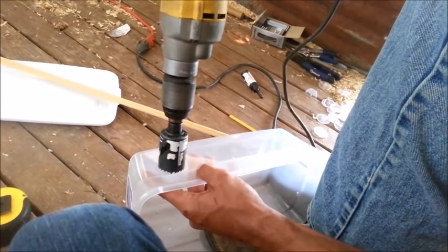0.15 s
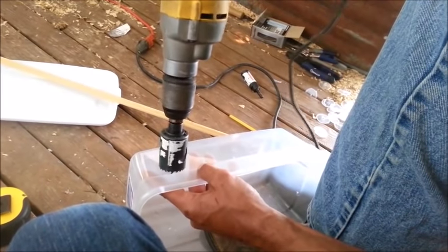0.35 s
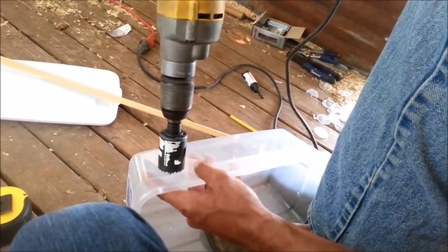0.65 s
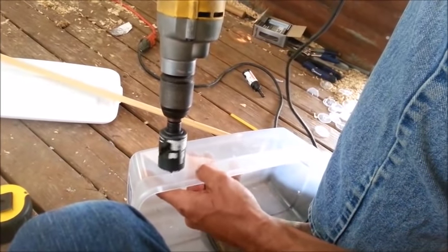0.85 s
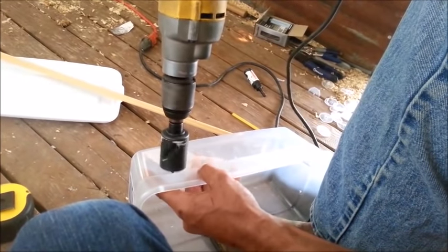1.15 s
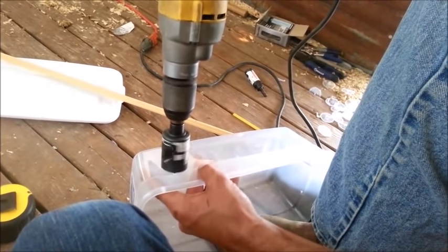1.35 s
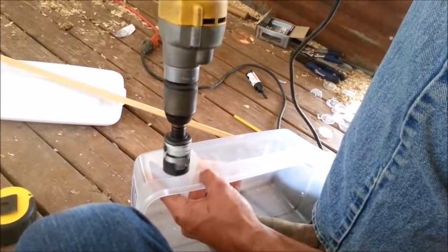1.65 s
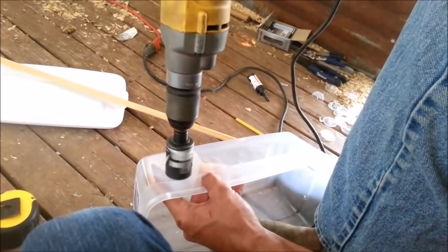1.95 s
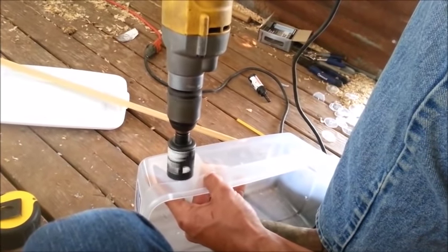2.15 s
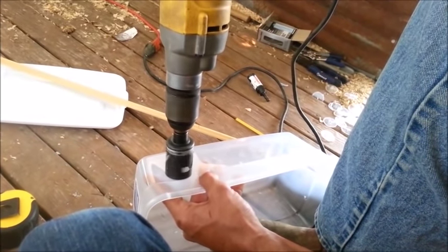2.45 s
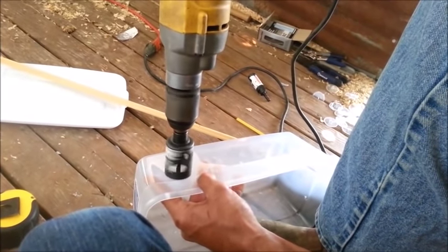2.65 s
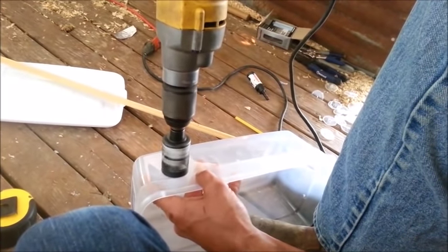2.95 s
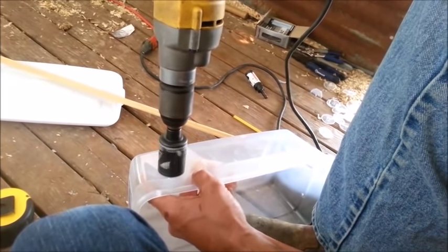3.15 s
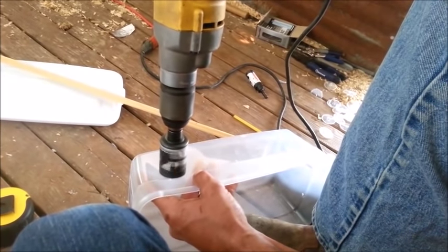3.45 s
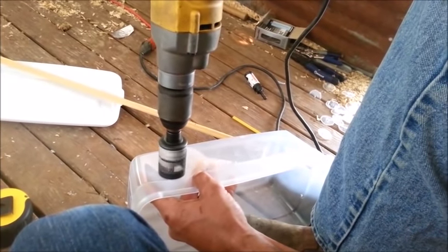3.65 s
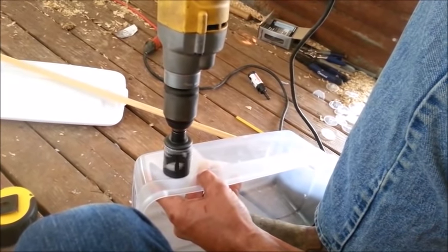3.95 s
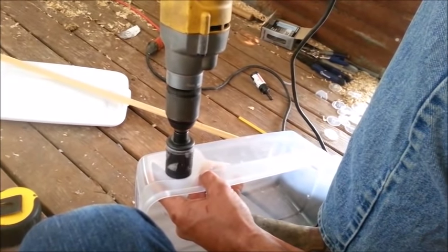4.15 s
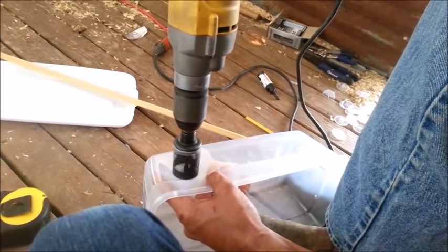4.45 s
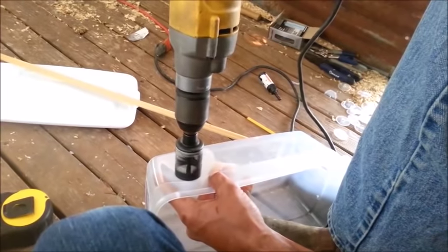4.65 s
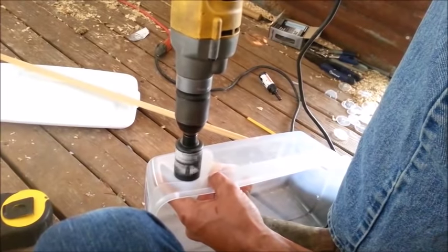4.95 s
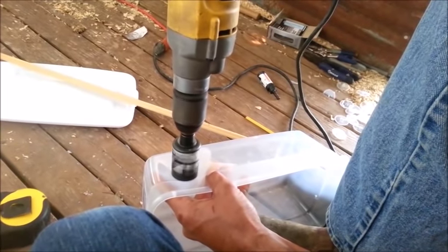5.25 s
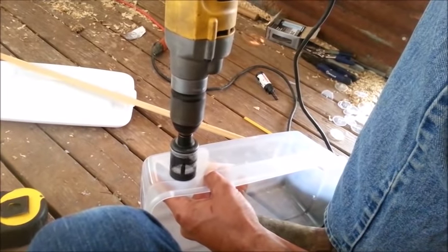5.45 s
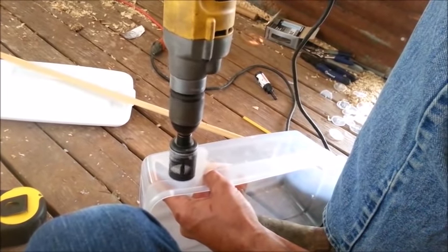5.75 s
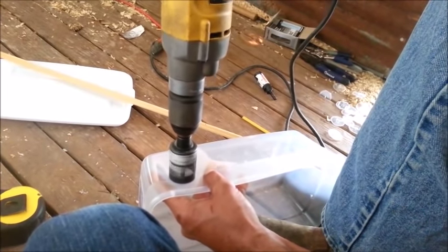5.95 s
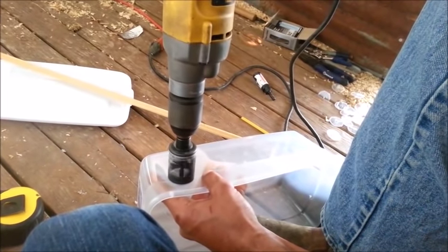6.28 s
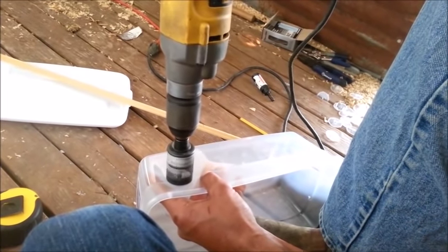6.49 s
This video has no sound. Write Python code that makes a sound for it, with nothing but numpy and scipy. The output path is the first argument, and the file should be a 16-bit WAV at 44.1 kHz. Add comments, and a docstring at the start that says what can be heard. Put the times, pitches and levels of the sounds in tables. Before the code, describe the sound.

A corded electric drill rattles, speeds up in steps with a rising whine, then its hole saw rasps into thin plastic.

```python
"""First, the loose gears of a coasting drill rattle and knock, outdoors, close to a mono microphone.
The trigger is squeezed step by step and mains pulses kick the corded motor up to speed: slots and gear
teeth whine, brushes hiss and the fan rushes. Near six seconds its hole saw bites a thin plastic tub with
a thump and rasps. The tub, deck boards and a wall reflect the sound; faint air and hum lie behind it."""
import sys
import numpy as np
from scipy import signal
from scipy.fft import rfft, irfft, next_fast_len
from scipy.io import wavfile
from scipy.ndimage import map_coordinates

SR = 44100
rng = np.random.default_rng(int(sys.argv[2]) if len(sys.argv) > 2 else 0)


def store_pcm(level_fs):
    """Save levels as 16-bit WAV."""
    pcm = np.round(np.clip(level_fs, -1, 1) * 32767).astype(np.int16)
    wavfile.write(sys.argv[1], SR, np.atleast_2d(pcm).T)


N = 291942
TIME = np.arange(N) / SR

# Trigger squeezes: t/s, added shaft speed/Hz, rattle jolt/dB, thrum jolt/dB
SQUEEZES = [(.675, 50, -1.5, 20), (.805, 88.4, 6, -.5), (1.595, 3, 4.5, 3.5), (1.84, 29.7, 4.5, 4),
            (2.119, 9.5, 5, 6), (2.357, 88, 2.5, 5), (2.486, 14.7, -1.5, -2.5), (3.533, 9.7, 1, 2),
            (3.921, 30.5, -1, 1), (4.203, 10.44, 0.5, 1), (5.065, 9, 1, 0), (5.509, 7.7, -.5, 2.5)]
# Backlash knocks: t/s, relative level/dB
KNOCKS = [(0.2019, -14), (0.2824, -17), (0.3975, -23), (0.601, -34), (0.688, -18.5), (0.745, -14),
          (0.757, -11), (1.2047, -17), (1.6222, -22)]
# Resonances of the metal gear case and of the housing: f/Hz, width/Hz, gain/dB
CASE_MODES = [(2087, 180, -6), (2244, 190, 0.5), (2391, 62, -0.5), (2630, 59, -13), (2810, 580, -9),
              (3950, 330, -24), (4550, 200, -29), (8200, 120, -28)]
HOUSING_MODES = [(342, 64, 7.5), (465, 94, 4.5), (890, 290, -14)]
# Gear and shaft tones: multiple of the shaft speed, relative level/dB
GEAR_ORDERS = [(2, 0.5), (2.583, -6.5), (4, 2.5), (5.167, -8.5), (6, -3), (7.75, -3.5), (8.75, -16),
               (17, -31), (19, -15), (34, 1.5), (60, 5)]
# How well the drill's shell radiates the gear tones and each armature whine: f/Hz, gain/dB
GEAR_RESPONSE = [(180, -12), (370, -6), (590, -1), (670, -19), (810, -1.5), (1170, 2.5), (1400, -16),
                 (1700, -7), (2100, 6.5), (2750, -7), (4300, -12), (4720, 12), (5300, -6), (7200, -24),
                 (10500, -48)]
SLOT_RESPONSE = [(900, -78), (1400, -44), (1800, -22), (2100, -18.5), (2600, -17), (3250, -25.5),
                 (3830, -26), (3990, -18), (4060, -22)]
BAR_RESPONSE = [(1800, -66), (2600, -50), (3150, -39), (3480, -24), (4250, -23), (4750, -18.5), (5400, -26),
                (6050, -19.5), (7300, -25.5), (7700, -36)]
WHISTLE_RESPONSE = [(3200, -65), (4100, -42), (4750, -24), (5700, -29), (7300, -24.5), (9400, -32),
                    (11800, -33.5), (12350, -24), (13200, -38.5)]
# Spectra of brush hiss, fan air and saw rasp: f/Hz, relative level/dB
BRUSH_SPECTRUM = [(1500, -45), (2600, -1), (2920, 2.5), (3250, -0.5), (3950, 0.5), (4300, 0), (4810, 4.5),
                  (5250, 0.5), (6130, -0.5), (6950, -6), (7600, -9), (7860, -0.5), (8150, -17), (9900, -16),
                  (11000, -33.5), (12200, -77)]
FAN_SPECTRUM = [(60, -60), (140, -55), (220, -18.5), (400, -17), (650, -14.5), (780, -0.5), (890, 1.5),
                (1130, -1), (1330, -5), (1580, -9), (1850, -4.5), (2100, -0.5), (2700, -21), (4000, -17.5),
                (9000, -15.5), (12000, -66)]
RASP_SPECTRUM = [(150, -45), (320, 12), (480, -4), (650, -21), (1600, 2), (2100, 8), (3300, 12.5),
                 (4300, 14.5), (5500, -15), (9000, -0.5), (12000, -53)]
# The saw's rasp and drone on the tub: t/s, level/dB
SAW_LEVEL = [(5.6, -57), (5.93, -21), (5.96, -13.5), (6.1, -15.5), (6.25, -15), (6.45, -14.5), (6.62, -15)]
# Reflections from the tub, the deck boards and the wall: delay/s, gain/dB
ECHOES = [(.0023, -30.5), (.0047, -19.5), (.0079, -17), (.0131, -19.5), (.0173, -21.5), (.0262, -20.5)]
# A low hum near the microphone: t/s, level/dB
HUM_LEVEL = [(0, -47), (4.6, -52.5), (4.9, -91), (6.62, -63)]
# Open air around the microphone: f/Hz, relative level/dB
OUTDOOR_SPECTRUM = [(20, -33), (50, -17), (90, -5.5), (350, 5.5), (700, -8), (2000, -10), (8000, -21),
                    (14000, -35)]
# Loudness laws: relative level at speed/dB, fall per octave below the knee/dB, knee/Hz,
# gain per octave that the rotor lags the trigger/dB, gain while cutting/dB
RATTLE_LAW = (-20, 6, 142, 0.66, 4)
THRUM_LAW = (-31.5, 5.5, 174, 4, 5.5)
HISS_LAW = (-12.5, 11.5, 266, 5, -1.2)
FAN_LAW = (-15, 14, 277, -3.5, -4.2)
MESH_LAW = (-28.5, 19, 201, 1, -7)

MAINS_HZ, BAND_LIMIT_HZ = 60.07, 14480
FULL_TRIGGER_HZ = 401  # trigger setting at which the mains would pass unchopped
SQUEEZE_S, INERTIA_S, COAST_HZ = .06, .672, 57.89  # length of a squeeze, rotor lag, opening speed
JOLT_RISE_S, JOLT_FADE_S = 0.03, 0.18
BITE_S = 5.9445  # the saw's teeth catch the plastic
DRAG_HZ, SNAG_HZ, SNAG_S = 6, 26.93, .12  # speed lost to cutting, extra loss at the bite, its decay
MESH_PULL_HZ, MESH_PULL_DB = 40, 3.5  # gear tones: reference pull, gain per doubling of pull
RATTLE_CHOP, SLOT_CHOP, SPARK_CHOP, SPARK_IDLE = .55, 3.6, 0.16, 0.039  # how much each follows the kicks


def motor():
    """Trigger setting and shaft speed in Hz: the heavy rotor creeps toward the setting, less saw drag."""
    trigger = sum(hz * ramp(s, SQUEEZE_S) for s, hz, _, _ in SQUEEZES)
    drag = (TIME > BITE_S) * (DRAG_HZ + SNAG_HZ * fading(BITE_S, SNAG_S))
    step = 1 / (INERTIA_S * SR)
    driven = signal.lfilter([step], [1, step - 1], trigger - drag)
    return trigger, driven + COAST_HZ * fading(0, INERTIA_S)


def mains_kicks(share, lag, sharp):
    """Gain of mean power 1 that peaks once a mains cycle, when the trigger switch fires."""
    pulse = np.exp(sharp * np.cos(2 * np.pi * (MAINS_HZ * TIME - lag)))
    share = np.clip(share, 0, 1)
    return np.sqrt(1 - share + share * pulse / pulse.mean())


def jolts():
    """The gears shake after each squeeze, then settle: extra dB of rattle and of thrum."""
    return sum(np.outer(db, ramp(s, JOLT_RISE_S) * fading(s, JOLT_FADE_S)) for s, _, *db in SQUEEZES)


def loudness(law, speed, pull):
    """A part's level in dB: grows with speed up to a knee, shifts as the motor pulls and the saw cuts."""
    full_db, octave_db, knee_hz, lag_db, cutting_db = law
    octaves_below = np.log2(1 + (knee_hz / speed) ** 4) / 4
    octaves_behind = np.log2(1 + pull / speed)
    return full_db - octave_db * octaves_below + lag_db * octaves_behind + cutting_db * ramp(BITE_S, .05)


def gearbox(speed, chop, rattle_db, thrum_db):
    """Loose teeth clatter at every mains kick and ring the metal case and the housing."""
    teeth = contacts(500 + 9 * speed, spread_db=0.0, life=0.0028)
    teeth *= mains_kicks(chop, lag=0.58, sharp=2.4)
    rattle = coloured(ring(teeth, CASE_MODES),
                      [(600, 0), (1500, -3.5), (1900, 9.5), (9000, -4.5), (12000, -53)])
    shake = contacts(14 * speed, spread_db=2.5, life=0.001) * mains_kicks(2 * chop, lag=0.56, sharp=1)
    thrum = coloured(ring(shake, HOUSING_MODES),
                     [(50, -37), (170, -5.5), (280, 1), (540, 5.5), (680, -5), (1200, 5), (9000, -42)])
    return amp(rattle_db - 2) * rattle + amp(thrum_db - 1.5) * thrum


def backlash():
    """Single knocks as the slack in the gears is taken up."""
    blows = np.zeros(N)
    t = np.arange(SR // 20) / SR
    for s, db in KNOCKS:
        blows[round(s * SR):][:len(t)] += amp(db - 60 * t / 0.049) * rng.standard_normal(len(t))
    struck = amp(3) * ring(blows, CASE_MODES) + amp(-9) * ring(blows, HOUSING_MODES) + amp(-11.5) * blows
    return filtered(struck, lambda f: f ** 2 / (f ** 2 + 200 ** 2) / (1 + (f / 7500) ** 8))


def gear_tones(turns, pull, mesh_db):
    """Meshing teeth sing, louder under load, swelling as they sweep through the shell's resonances."""
    tones = sum(amp(db + 3.2 * wobble(6.03)) * np.sin(2 * np.pi * order * turns + .5 * wobble(25))
                for order, db in GEAR_ORDERS)
    load_db = MESH_PULL_DB * np.log2(.05 + pull / MESH_PULL_HZ)
    return np.sqrt(2) * amp(mesh_db + load_db) * filtered(tones, lambda f: amp(along(GEAR_RESPONSE, f)))


def armature_whine(speed, turns, chop):
    """The armature's slots and bars sing; each mains kick twists the rotor and smears the pitch."""
    slot_order, bar_order, whistle_order = 12, 24, 40  # cycles per turn
    angle = 2 * np.pi * turns
    sway = np.sin(2 * np.pi * MAINS_HZ * TIME)
    strain = np.interp(speed, [195, 245], [1, .12])  # greatest while the motor gathers speed
    cogging = np.interp(speed, [135, 158], [1, 0])  # a slow rotor turns in jerks
    slot_jerk = chop * (.5 * sway + (0.46 + 1.4 * strain) * wobble(170))
    slots = mains_kicks(chop, lag=0.43, sharp=7.8) * np.sin(slot_order * angle + slot_jerk)
    bar_jerk = strain * (sway + wobble(220))
    bars = mains_kicks(strain, lag=.45, sharp=3.7) * np.sin(bar_order * angle + bar_jerk)
    bars = 0.68 * bars + ring(bars, [(4600, 150, -1.2)])  # the motor frame squeals as the tone passes
    flicker = amp(3.1 * wobble(40))
    whistle_jerk = .5 * sway + (0.28 + .5 * strain + 1.6 * cogging) * wobble(190)
    whistle = flicker * np.sin(whistle_order * angle + whistle_jerk)
    whines = [(slots, SLOT_RESPONSE, slot_order), (bars, BAR_RESPONSE, bar_order),
              (whistle, WHISTLE_RESPONSE, whistle_order)]
    return np.sqrt(2) * sum(amp(along(response, order * speed) + 1.7 * wobble(9.9)) * tone
                            for tone, response, order in whines)


def brushes(speed, chop, hiss_db):
    """Carbon brushes scrape on the commutator and spark at each kick."""
    scrape = contacts(24 * speed, spread_db=2.5, life=0.0018) * mains_kicks(chop, lag=0.55, sharp=3.5)
    return amp(hiss_db - 1) * coloured(scrape, BRUSH_SPECTRUM)


def fan(air_db):
    """Cooling air rushes through the vents."""
    return amp(air_db + 1.5 + 1.4 * wobble(13)) * coloured(noise(), FAN_SPECTRUM)


def hole_saw(turns):
    """The saw bites with a thump, rasps, and passes the shaft's shaking on to the tub."""
    rasp = coloured(contacts(1500, spread_db=3.5, life=0.0011), RASP_SPECTRUM)
    shaking = np.sin(2 * np.pi * turns) + amp(-9.5) * np.sin(4 * np.pi * turns)
    drone = amp(-11 + 1.21 * wobble(15)) * shaking
    t = np.maximum(TIME - BITE_S, 0)
    swell = t / 0.00069  # the thin wall flexes for only a few cycles
    thump = amp(7.5) * swell ** 2 * np.exp(-swell) * np.sin(2 * np.pi * 440 * t)
    thump = filtered(thump, lambda f: f ** 4 / (f ** 4 + 170 ** 4))  # a small wall radiates no deep bass
    return amp(along(SAW_LEVEL, TIME)) * (rasp + drone) + thump


def reflections(x):
    """Close surfaces send weak, late copies to the microphone, which make sweeping tones flutter."""
    copies = sum(amp(db) * np.pad(x, (round(s * SR), 0))[:N] for s, db in ECHOES)
    return amp(-0.21) * (x + copies)


def outdoor_ambience():
    """Behind the drill: quiet open air and a nearby hum at twice the mains frequency."""
    hum = np.sqrt(2) * amp(along(HUM_LEVEL, TIME)) * np.sin(2 * np.pi * 2 * MAINS_HZ * TIME)
    return hum + amp(-46) * coloured(noise(), OUTDOOR_SPECTRUM)


def contacts(rate, spread_db, life):
    """Short scrapes at random times, rate a second, whose power decays over life seconds; rms 1."""
    size = amp(spread_db * np.clip(noise(), -2, 2)) * (rng.random(N) < rate / SR)
    power = signal.lfilter([1], [1, -np.exp(-1 / (life * SR))], size ** 2) / rate
    return unit(np.sqrt(power) * noise())


def ring(x, modes):
    """x through the resonances of a body."""
    return filtered(x, lambda f: sum(amp(db) * 1j * f * width / (hz * hz - f * f + 1j * f * width)
                                     for hz, width, db in modes))


def coloured(x, spectrum):
    """x shaped by (f/Hz, level/dB) points, at rms 1."""
    hz, db = np.transpose(spectrum)
    return unit(filtered(x, lambda f: amp(np.interp(np.log(f + 1), np.log(hz), db))))


def filtered(x, response):
    """x times a complex response of frequency."""
    size = next_fast_len(N + SR // 2)
    return irfft(rfft(x, size) * response(np.fft.rfftfreq(size, 1 / SR)), size)[:N]


def noise():
    """Fresh white noise."""
    return rng.standard_normal(N)


def wobble(rate):
    """A smooth random curve, rate knots a second."""
    return map_coordinates(rng.standard_normal(int(N * rate / SR) + 4), [TIME * rate])


def along(points, at):
    """Reads between points joined by straight lines."""
    return np.interp(at, *np.transpose(points))


def ramp(start, length):
    """Rises from 0 to 1."""
    return np.clip((TIME - start) / length, 0, 1)


def fading(start, life):
    """1 until the start, then an exponential decay."""
    return np.exp(-np.maximum(TIME - start, 0) / life)


def amp(db):
    """Decibels to gain."""
    return 10 ** (np.asarray(db) / 20)


def unit(x):
    """Scale to rms 1."""
    return x / np.sqrt(np.mean(x ** 2) + 1e-20)


def scene():
    """The drill at close range, driven by one shaft's speed and pull; one microphone on both channels."""
    trigger, speed = motor()
    pull = np.maximum(trigger - speed, 0)  # Hz by which the rotor lags the trigger
    turns = np.cumsum(speed + 0.182 * wobble(20)) / SR
    # a light squeeze passes only slivers of the mains
    chop = (trigger > 0) * np.clip(1 - trigger / FULL_TRIGGER_HZ, 0, 1)
    rattle_jolt, thrum_jolt = jolts()
    rattle_db = loudness(RATTLE_LAW, speed, pull) + rattle_jolt + 0.49 * wobble(11)
    thrum_db = loudness(THRUM_LAW, speed, pull) + thrum_jolt + 1.25 * wobble(11)
    hiss_db = loudness(HISS_LAW, speed, pull) + 0.88 * rattle_jolt
    clatter = gearbox(speed, RATTLE_CHOP * chop, rattle_db, thrum_db) + backlash()
    hiss = brushes(speed, SPARK_IDLE + SPARK_CHOP * chop, hiss_db)
    rush = fan(loudness(FAN_LAW, speed, pull))
    mesh = gear_tones(turns, pull, loudness(MESH_LAW, speed, pull))
    whine = armature_whine(speed, turns, np.minimum(SLOT_CHOP * chop, 1))
    direct = clatter + hiss + rush + mesh + whine + hole_saw(turns)
    return np.tile(reflections(direct) + outdoor_ambience(), (2, 1))


def record(dry):
    """The recorder clips peaks at full scale and keeps nothing above its band limit."""
    return np.array([filtered(x, lambda hz: hz < BAND_LIMIT_HZ) for x in np.clip(dry, -1, 1)])


dry = scene()
out = record(dry)
store_pcm(out)
```